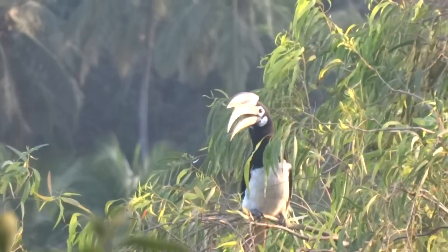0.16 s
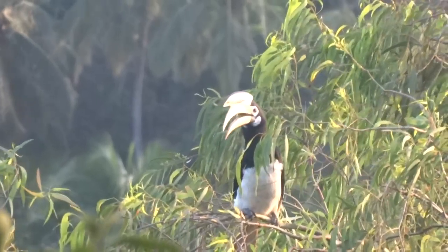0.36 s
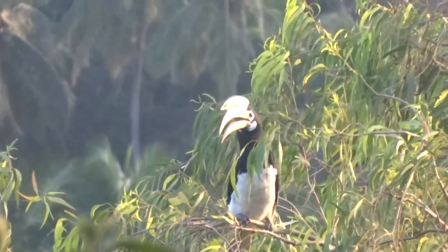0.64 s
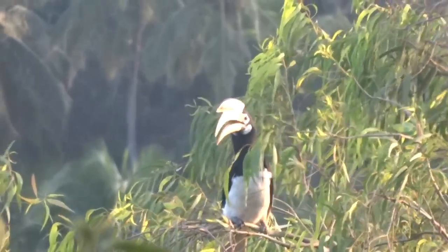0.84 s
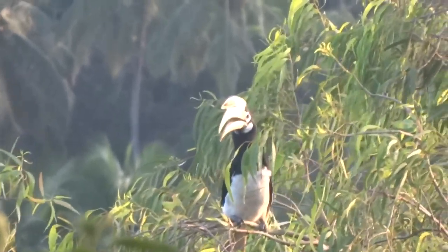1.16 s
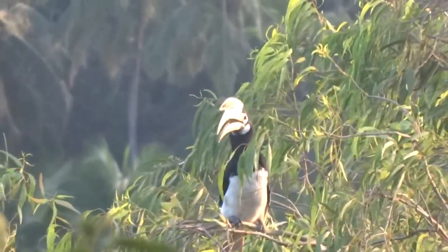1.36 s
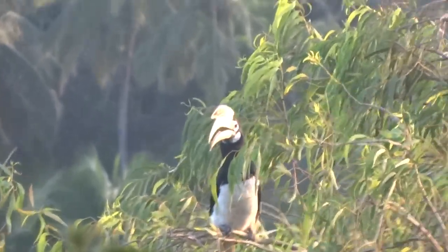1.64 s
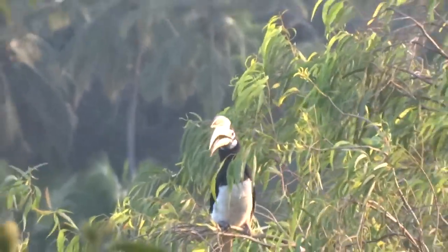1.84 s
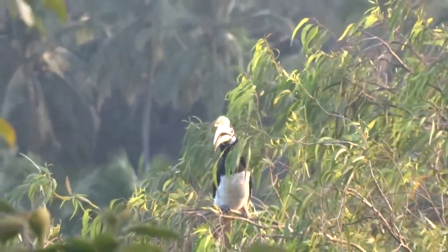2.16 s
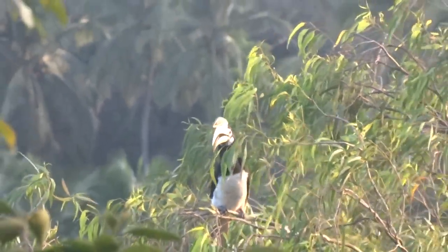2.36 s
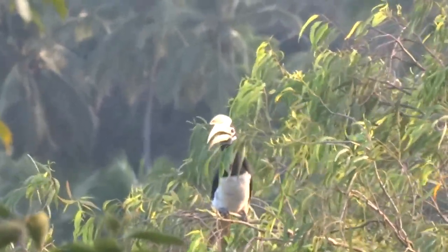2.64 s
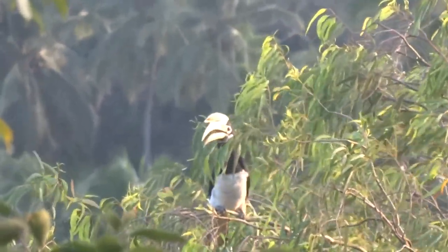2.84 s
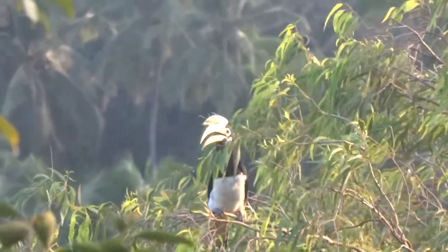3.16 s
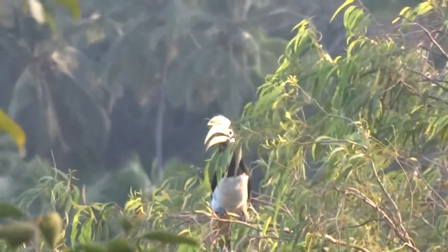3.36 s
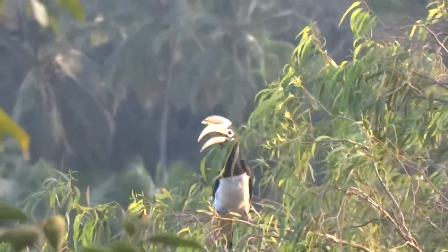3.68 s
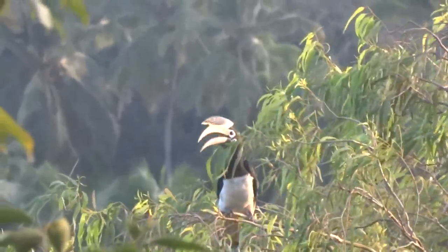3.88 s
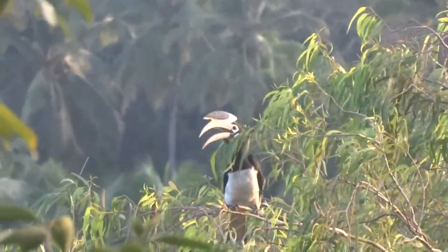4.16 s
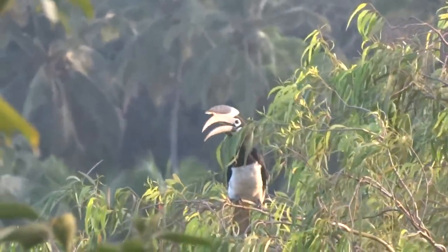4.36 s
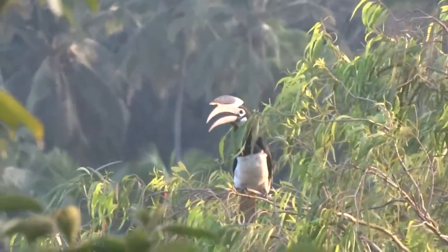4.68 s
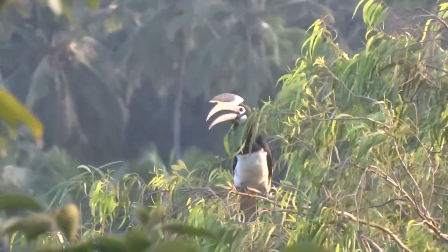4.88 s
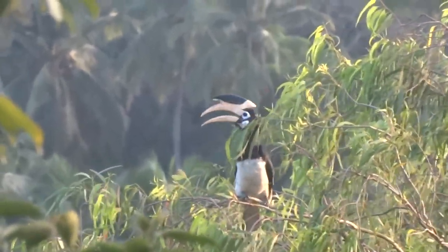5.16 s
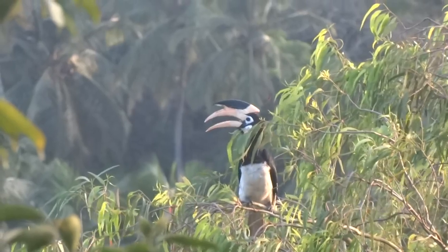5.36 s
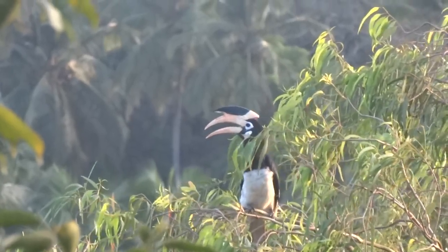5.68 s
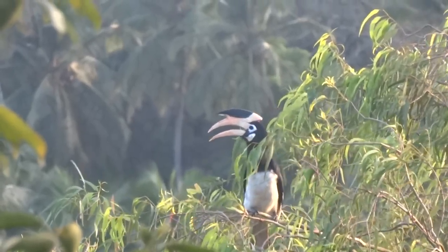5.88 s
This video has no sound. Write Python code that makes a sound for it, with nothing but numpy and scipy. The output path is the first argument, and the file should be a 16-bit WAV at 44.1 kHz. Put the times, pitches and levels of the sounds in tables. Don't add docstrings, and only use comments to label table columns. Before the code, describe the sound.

Far-off engine putter, breeze in leaves and high insect song, then five loud hoarse bird calls breaking into squeals, echoing off trees.

```python
import sys
import numpy as np
from scipy import signal
from scipy.fft import rfft, irfft, next_fast_len
from scipy.io import wavfile
from scipy.ndimage import uniform_filter1d

SR = 44100
rng = np.random.default_rng(int(sys.argv[2]) if len(sys.argv) > 2 else 0)


def undo_db(level):
    steps = np.asarray(level, float) / 20
    return 10 ** steps


def unload_audio(sound):
    columns = np.transpose(np.atleast_2d(sound))
    steps = np.round(np.clip(columns, -1, 1) * 32767)
    wavfile.write(sys.argv[1], SR, steps.astype(np.int16))


N = 265349
T = np.arange(N) / SR

HOARSE, RASPY, DOUBLED, FIRM, CLEAR = (.3, .65), (.12, .28), (.6, .3), (.25, .17), (.06, .065)
SQUEAL, SHRIEK = (.05, .06), (.2, .17)

# (time [s], level [dB], throttle [0-1])
ENGINE_LOAD = [(0, -42, 0.2), (.2, -47.5, 0.4), (.33, -41.5, 0.84), (.48, -36.5, 1), (.74, -39.5, 0.81),
               (.84, -37.5, 0.88), (1.02, -40.5, 0.52), (1.29, -41, .7), (1.52, -43, 0.26),
               (2.5, -45.5, 0.2), (2.66, -42.5, 0.7), (2.93, -40.5, 0.4), (3.2, -41, 0.66),
               (3.5, -43, 0.28), (3.9, -44, 0.23), (4.56, -43, 0.19), (5.2, -41, 0.38), (6.02, -42.5, 0.49)]
# (time [s], level [dB])
BREEZE = [(0, -36.5), (.55, -40), (1.29, -44), (1.78, -45), (2.06, -51), (2.6, -50), (2.75, -46.5),
          (3.35, -47), (4, -47), (4.8, -48.5), (5.4, -46), (6.02, -51)]
# (frequency [Hz], density [dB per Hz])
LEAF_SPECTRUM = [(1060, -14.5), (1800, -3.5), (2160, -4), (2660, -4), (3160, -5), (3920, -10), (4970, -4.5),
                 (5340, -4.5), (7160, -5), (7820, -7.5), (8530, -6.5), (9760, -11.5), (12000, -19.5),
                 (15600, -64), (22000, -120)]


def hornbill():
    # (time [s], effort [dB], bill opening [0-1])
    calls = [
        [(3.45, -50, 0.3), (3.48, -39.5, 0), (3.51, -33.5, 0.37), (3.558, -25, .8), (3.586, -24.5, 1),
         (3.626, -23, 1), (3.636, -26.5, 0.62), (3.68, -40.5, .5)],
        [(4.015, -62, 0), (4.037, -36.5, 0.18), (4.055, -27.5, 0.96), (4.066, -35, 0.52), (4.07, -31.5, .4),
         (4.078, -26.5, 0.68), (4.197, -23, 0.83), (4.215, -29, 0.58), (4.245, -38, 0.48)],
        [(4.63, -56, 0.1), (4.694, -32.5, 0.5), (4.724, -30.5, 0.4), (4.754, -25, 0.81), (4.766, -28.5, 0.44),
         (4.8, -39, 0.43), (4.82, -57, .4)],
        [(4.995, -69, .3), (5.011, -44, .1), (5.035, -33.5, 0.49), (5.075, -30, 0.38), (5.115, -43.5, 0.56)],
        [(5.295, -50, 0), (5.323, -39.5, 0.09), (5.363, -34.5, 0.16), (5.419, -34, 0.27), (5.441, -33, .4),
         (5.48, -54, .4)],
    ]
    # (frequency [Hz], width [Hz], level [dB])
    upper_modes = [(3560, 920, 2.5), (4260, 460, 3)]
    lower_modes = [(2876, 325, 11.5), (3370, 420, 5.5)]
    throat_modes = [(1267, 273, -3), (1830, 310, -0.5), (2190, 394, 0)]
    casque_modes = [(5660, 3600, -1), (7800, 650, 5), (8315, 670, -0.5), (10800, 1200, -12)]
    gape_modes = [(4820, 550, -4)]
    # (level with bill shut [dB], level with it wide open [dB])
    opening_levels = [(3.5, -7.5), (8, -14.5), (-12, 0.5)]
    # (frequency [Hz], density [dB per Hz])
    breath_spectrum = [(900, -40), (1500, 7), (3000, 0), (4800, -8), (5600, -14), (8500, -3), (11500, -17),
                       (15700, -26)]
    breath_db = -15

    pitch_hz, contrast, rough = membranes()
    at, cycles = beats(pitch_hz)
    i = at.astype(int)
    luck = rng.standard_normal((len(at), 2))
    at = at + .075 * rough[i] * luck[:, 0] * SR / pitch_hz[i]
    alternation = 1 + contrast[i] * (-1.) ** np.arange(len(at))
    shimmer = undo_db(3.5 * rough[i] * luck[:, 1])
    slaps = pulses(at, alternation * shimmer * np.sqrt(SR / pitch_hz[i]))
    turbulence = unit(rng.standard_normal(N) * np.exp(-1.5 * (cycles % 1)))
    share = np.clip(rough, 0, 1)
    source = np.sqrt(1 - share) * slaps + np.sqrt(share) * turbulence

    tables = (upper_modes, lower_modes, throat_modes, casque_modes, gape_modes)
    parts = [filtered(source, lambda f: modes(m)(f) ** 2) for m in tables]
    parts = [p / np.sqrt(np.abs(uniform_filter1d(p ** 2, size=500)) + 1e-9) for p in parts]
    upper, lower, *others = parts
    squeal = np.clip((pitch_hz - 1000) / 250, 0, 1) * np.sin(2 * np.pi * cycles)
    upper = upper + undo_db(-4.5) * squeal
    lower = lower * undo_db(-7 * (pitch_hz > 1000))
    hiss = undo_db(breath_db) * unit(filtered(rng.standard_normal(N), lambda hz: undo_db(along(breath_spectrum, hz))))

    out = np.zeros(N)
    for call in calls:
        effort_db, opening = curves(call)
        rest_db = [shut_db + (wide_db - shut_db) * opening for shut_db, wide_db in opening_levels]
        rest_db.append(.5 * (effort_db + 24) - 2)
        rest = sum(undo_db(db) * p for db, p in zip(rest_db, [lower, *others]))
        gate = np.clip(np.minimum(T - call[0][0], call[-1][0] - T) / .004, 0, 1)
        out += gate * undo_db(effort_db - 0.63) * (upper + undo_db(.5 * (effort_db + 29)) * hiss + rest)
    return out


def membranes():
    notes = [(3.451, 638, 667, FIRM), (3.495, 552, 608.4, DOUBLED), (3.528, 605.4, 618, HOARSE),
             (3.557, 626, 626.4, RASPY), (3.59, 1308, 1311, SHRIEK), (3.61, 1321, 1230, SHRIEK),
             (3.636, 610.4, 604, HOARSE), (4.02, 478.6, 615.4, HOARSE), (4.044, 1256, 1352, SQUEAL),
             (4.066, 581.8, 598.7, CLEAR), (4.1, 602.5, 626.3, CLEAR), (4.122, 630.2, 642.3, FIRM),
             (4.133, 593, 605.6, RASPY), (4.206, 598, 605, HOARSE), (4.64, 620, 631, DOUBLED),
             (4.667, 478.6, 542, HOARSE), (4.708, 541, 563.3, RASPY), (4.737, 585.4, 582.3, CLEAR),
             (4.765, 543, 580, HOARSE), (5.0, 485.3, 579, HOARSE), (5.048, 585, 555, RASPY),
             (5.072, 558, 549, HOARSE), (5.301, 506, 529, HOARSE), (5.335, 530, 560.4, FIRM),
             (5.358, 555, 546, FIRM), (5.42, 548, 505, HOARSE)]
    break_s, longest_s = .004, .075
    following = notes[1:] + [(np.inf,)]
    ends = [min(s + longest_s, after - break_s) for (s, *_), (after, *_) in zip(notes, following)]
    rows = []
    for (s, first_hz, last_hz, register), end in zip(notes, ends):
        rows += [(s, first_hz, *register), (end, last_hz, *register)]
    return [np.clip(c, 0, None) for c in curves(rows)]


def engine():
    # (time [s], firing rate [firings per s])
    firing_rate = [(0, 32.1), (.6, 33.0), (1.2, 33.1), (1.8, 33.6), (2.3, 33.95), (3, 34.25), (3.8, 34.45),
                   (4.4, 34.75), (5, 35.3), (5.5, 36.25), (6, 37.1)]
    # (frequency [Hz], width [Hz], level [dB])
    pipe_modes = [
        [(380, 110, 0), (450, 120, 0)],
        [(840, 160, 0), (980, 190, 0)],
        [(1145, 90, 0), (1560, 90, -2)],
        [(1260, 190, 0), (1650, 160, -6)],
    ]
    boom_db, boom_range_db = -68.5, 25
    tuned_rate, drift_db = 34.1, 5
    gas_share = .12

    rate, = curves(firing_rate)
    level_db, throttle = curves(ENGINE_LOAD)
    at, cycles = beats(rate, start=.52)
    luck = rng.standard_normal((len(at), 2))
    firings = pulses(at + 1.2 * luck[:, 0], undo_db(1.5 * luck[:, 1]))
    burst = np.exp(-3 * (cycles % 1))
    gas = unit(burst * rng.standard_normal(N))
    drive = np.sqrt(1 - gas_share) * unit(firings) + np.sqrt(gas_share) * gas

    over = rate - tuned_rate
    panel_db = -7.5 + 10 * np.minimum(over, 0) - 5.5 * np.clip(2 * over - .5, 0, 1)
    higher = 1 / np.sqrt(1 + undo_db(-2 * drift_db * over))
    gains = [undo_db(boom_db + boom_range_db * throttle), undo_db(level_db + panel_db),
             undo_db(level_db) * np.sqrt(1 - higher ** 2), undo_db(level_db) * higher]
    rings = sum(g * unit(filtered(drive, lambda f: modes(m)(f) ** 3)) for g, m in zip(gains, pipe_modes))
    clatter = burst * filtered(rng.standard_normal(N), lambda hz: undo_db(along(LEAF_SPECTRUM, hz)))
    return undo_db(-2.0) * rings + undo_db(curves(BREEZE)[0] - 5) * unit(clatter)


def katydid():
    # (time [s], peak level [dB])
    song = [(0, -44), (1, -49), (2.4, -52), (2.8, -50), (6.02, -50)]
    wing_bands = [(7800, -40), (8050, -6), (8270, 8), (8520, -2), (8760, 9), (8950, -4), (9300, -50)]  # (Hz, dB per Hz)
    since = (T - .06) % .17
    env = undo_db(curves(song)[0]) * np.clip(since / .005, 0, 1) * np.clip((.15 - since) / .05, 0, 1)
    strokes = 1 + 0.24 * np.sin(2 * np.pi * 48 * T)
    return env * strokes * rush(wing_bands, patchy_db=1.9)


def cricket():
    # (time [s], level [dB], pitch [Hz])
    chirp_table = [(1.68, -50, 7100), (1.97, -53, 7140), (2.23, -56, 7170), (2.48, -57, 7200),
                   (2.74, -49, 7170), (3.03, -52, 7300), (3.18, -57, 7300), (3.29, -52, 7300),
                   (4.27, -45, 7360), (4.519, -57, 7280), (4.845, -44, 7290), (5.082, -42, 7310),
                   (5.302, -42, 7320), (5.53, -42, 7280), (5.764, -44, 7260)]
    out, t = np.zeros(N + SR), np.arange(SR // 8) / SR
    strokes = np.clip(t / 0.0023, 0, 1) * (1 + 0.45 * np.cos(2 * np.pi * 42 * t)) * undo_db(-60 * t / 0.37)
    for s, db, hz in chirp_table:
        out[round(s * SR):][:len(t)] += undo_db(db) * strokes * np.sin(2 * np.pi * hz * (t - 0.038 * t * t))
    return out[:N]


def plastic_tick():
    # (time [s], level [dB], frequency [Hz])
    tick_modes = [
        (0.706, -24.5, 3200),
        (.705, -26, 7200),
    ]
    out, t = np.zeros(N + SR), np.arange(SR // 8) / SR
    for s, db, hz in tick_modes:
        out[round(s * SR):][:len(t)] += undo_db(db - 60 * t / 0.014) * np.sin(2 * np.pi * hz * t)
    return out[:N]


def air():
    # (frequency [Hz], density [dB per Hz])
    puff_spectrum = [(12, -65), (20, -35), (46, -28), (117, -2.5), (333, -1), (380, -2.5), (448, -2),
                     (568, -7.5), (700, -5), (910, -7), (1540, -120)]
    drone_spectrum = [(180, -40), (300, -22), (420, -15), (600, -19), (800, -12), (1150, -6), (1500, -3),
                      (2150, -10), (3500, -30), (7000, -120)]
    fizz_spectrum = [(1300, -30), (2400, 15), (4300, -10), (7000, -6), (8500, 2), (9800, 1), (11000, -21),
                     (15700, -60)]
    top_spectrum = [(11000, -30), (12000, -2), (13000, -2), (14300, -2), (15000, -8), (15500, -20),
                    (15900, -120)]
    leaf_db, = curves(BREEZE)
    drone_db = -42.5 + 0.51 * (curves(ENGINE_LOAD)[0] + 42) + .3 * (leaf_db + 49)
    low = gusts() * rush(puff_spectrum, patchy_db=1.5) + undo_db(drone_db) * rush(drone_spectrum, patchy_db=1.0)
    fizz = undo_db(-41 - 20 * T) * rush(fizz_spectrum, patchy_db=2)
    top_db = -58.5 - 2.3 * T + 0.5 * (leaf_db + 50)
    top = undo_db(top_db) * rush(top_spectrum, patchy_db=-1)
    rustle = undo_db(leaf_db + 1.5) * rush(LEAF_SPECTRUM, patchy_db=1.5)
    return low + fizz + top + rustle


def gusts():
    # (time [s], peak level [dB])
    puff_peaks = [(.05, -45), (.14, -51.5), (.59, -45), (.89, -45), (1.29, -45), (1.64, -48.5), (1.95, -52),
                  (2.27, -50.5), (2.75, -53.5), (3.32, -49.5), (3.94, -51), (4.19, -52), (4.39, -61),
                  (4.58, -55)]
    rise_s, fall_s, calm_db = 0.042, 0.056, -56.5
    shape = lambda t: np.exp(-np.where(t < 0, -t / rise_s, t / fall_s))
    return undo_db(calm_db) + sum(undo_db(db) * shape(T - s) for s, db in puff_peaks)


def echoes(x, gap):
    # (frequency [Hz], 60 dB decay time [s])
    tree_decay = [(500, 1), (3000, 0.57), (6000, 0.48), (12000, 0.085)]
    hz, t, z = signal.stft(rng.standard_normal((2, SR // 2)), SR, nperseg=256)
    tail = signal.istft(z * undo_db(-60 * t / along(tree_decay, hz)[:, None]), SR, nperseg=256)[1]
    tail[1] = .9 * tail[0] + .43 * tail[1]
    late = np.pad(x, (round(gap * SR), 0))[None]
    return signal.fftconvolve(late, tail / np.linalg.norm(tail[0]), axes=1)[:, :N]


def rush(spectrum, patchy_db):
    # (frequency [Hz], left-right likeness [0-1])
    likeness = [(40, .97), (80, .85), (150, .62), (350, .5), (700, .5), (1300, .96), (3000, .97),
                (8000, .97), (13000, .85)]
    # (frequency [Hz], left minus right [dB])
    balance = [(60, -2), (180, 0.5), (550, -1), (1500, -3.5), (5000, -6.5), (15000, -1.5)]
    z = signal.stft(rng.standard_normal((2, N)), nperseg=512)[2]
    field = uniform_filter1d(rng.standard_normal(z.shape[1:]), size=5, axis=0)
    field = uniform_filter1d(field, size=10, axis=1)
    pair = signal.istft(z * undo_db(patchy_db * unit(field)), nperseg=512)[1][:, :N]
    turn = lambda hz: np.arccos(np.clip(along(likeness, hz), -1, 1)) / 2
    mid, side = filtered(pair, lambda hz: undo_db(along(spectrum, hz)) * [np.cos(turn(hz)), np.sin(turn(hz))])
    stereo = np.array([mid + side, mid - side])
    return unit(filtered(stereo, lambda hz: undo_db(np.outer([.5, -.5], along(balance, hz)))))


def modes(table):
    def response(f):
        return sum((-1) ** k * undo_db(db) * 1j * f * w / (c * c - f * f + 1j * f * w)
                   for k, (c, w, db) in enumerate(table))
    return response


def beats(rate, start=0):
    cycles = start + np.cumsum(rate) / SR
    return np.interp(np.arange(1, int(cycles[-1]) + 1), cycles, np.arange(N)), cycles


def pulses(at, size):
    taps = np.floor(at)[:, None] + np.arange(-7, 9)
    offset = taps - at[:, None]
    shape = np.sinc(offset) * np.cos(np.pi * offset / 16) ** 2
    return np.bincount(np.clip(taps, 0, N - 1).astype(int).ravel(), (size[:, None] * shape).ravel(), N)


def filtered(x, response):
    m = next_fast_len(N + SR // 4)
    return irfft(rfft(x, m) * response(np.fft.rfftfreq(m, 1 / SR)), m)[..., :N]


def along(points, hz):
    f, v = np.transpose(points)
    return np.interp(np.log(hz + 1), np.log(f + 1), v)


def curves(rows):
    s, *cols = np.transpose(rows)
    return [np.interp(T, s, c) for c in cols]


def unit(x):
    return x / np.sqrt(np.mean(x ** 2) + 1e-20)


def scene():
    bird, motor = hornbill(), engine()
    chirps = cricket() + plastic_tick()
    tree_line = undo_db(-25.0) * np.roll(bird, round(.125 * SR))
    near = bird * undo_db([[-.1], [.1]]) + undo_db(-12.5) * echoes(bird, gap=.03) + tree_line
    wall = undo_db(-23) * np.roll(motor, 160) * [[1], [-1]]
    far = motor * undo_db([[-1.4], [1.4]]) + undo_db(-6) * echoes(motor, gap=.008) + wall
    insects = chirps * undo_db([[-.8], [.8]]) + undo_db(-6) * echoes(chirps, gap=.012) + katydid()
    return near + far + insects + air()


def roll_off(x):
    return signal.sosfilt(signal.butter(12, 15780, fs=SR, output="sos"), x)


def record(dry):
    # (frequency [Hz], gain [dB])
    mic_response = [(20, -25), (50, 2.5), (80, 2.5), (11000, -1.5), (12200, -9), (15000, -13)]
    top_hz = 15780
    mix = filtered(dry, lambda hz: undo_db(along(mic_response, hz)) * (hz < top_hz))
    return roll_off(mix)


dry = scene()
out = record(dry)
unload_audio(out)
```